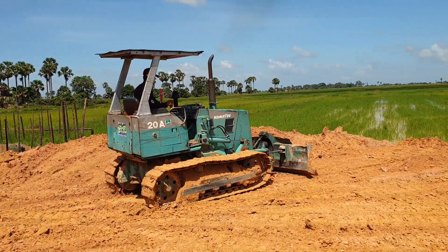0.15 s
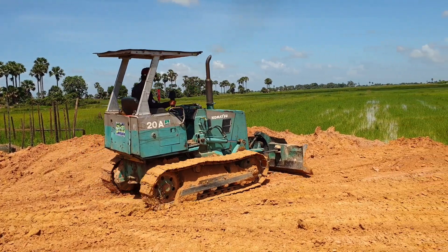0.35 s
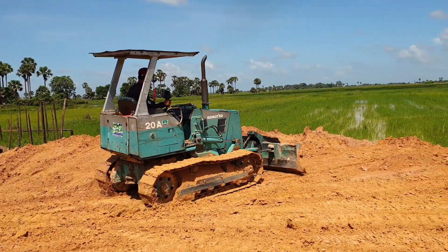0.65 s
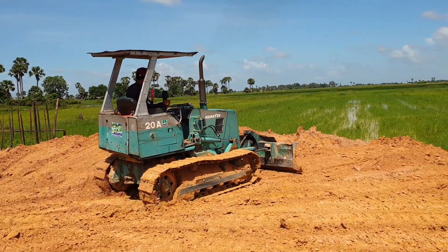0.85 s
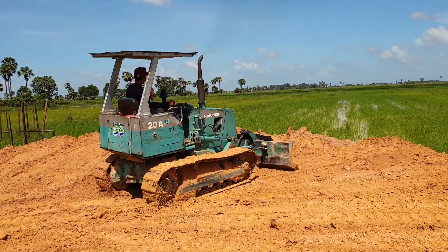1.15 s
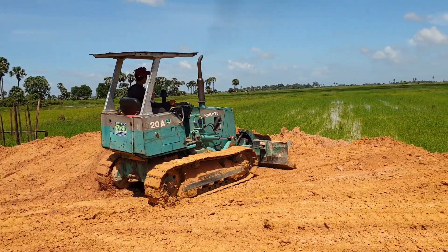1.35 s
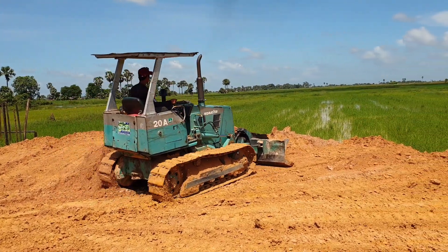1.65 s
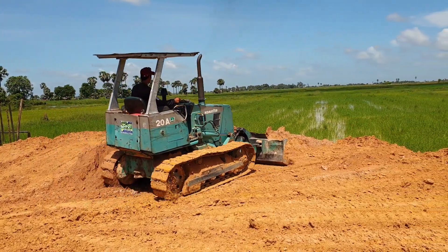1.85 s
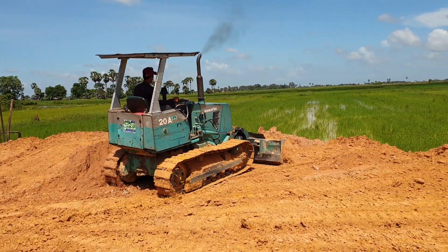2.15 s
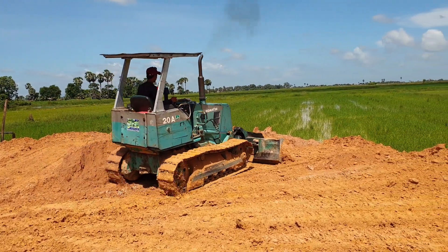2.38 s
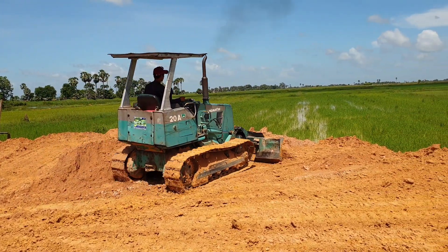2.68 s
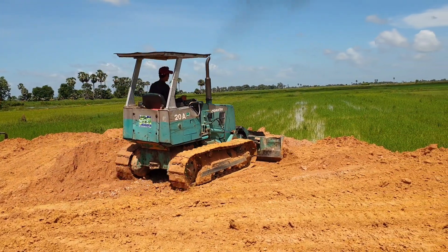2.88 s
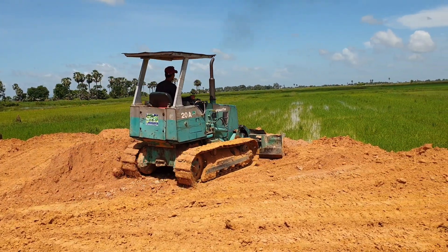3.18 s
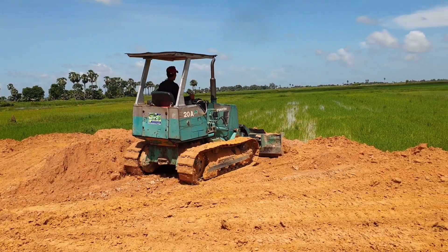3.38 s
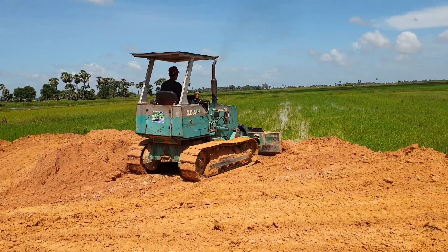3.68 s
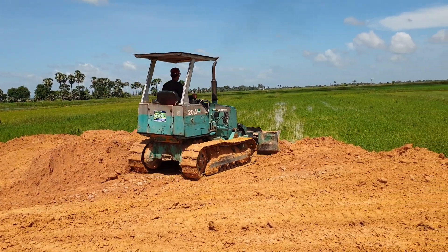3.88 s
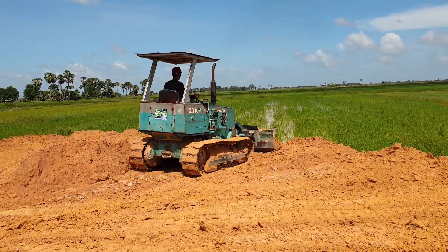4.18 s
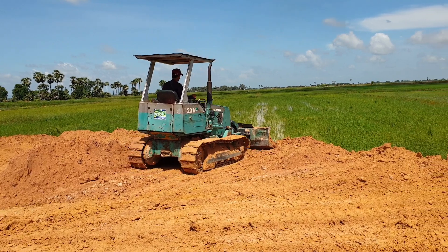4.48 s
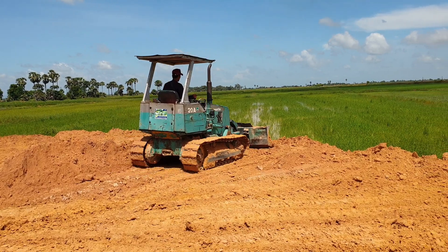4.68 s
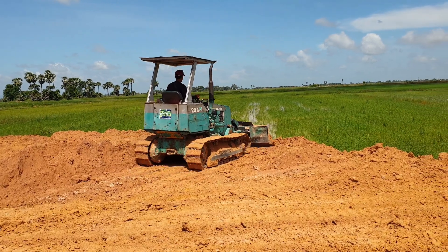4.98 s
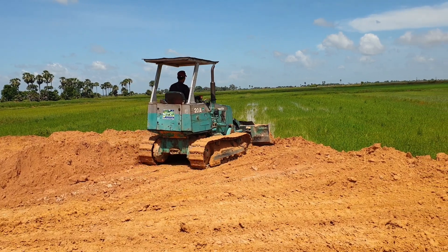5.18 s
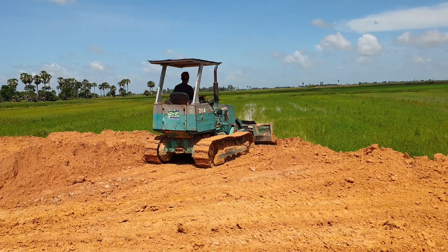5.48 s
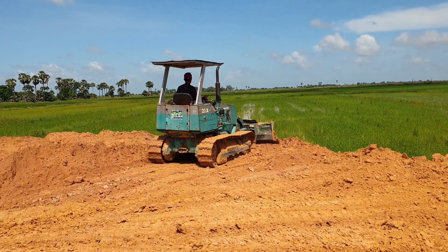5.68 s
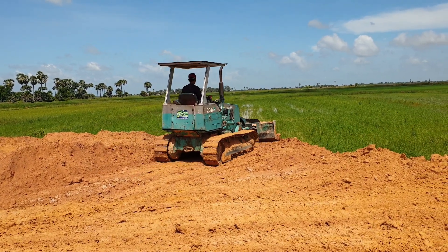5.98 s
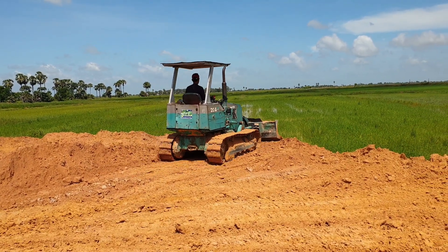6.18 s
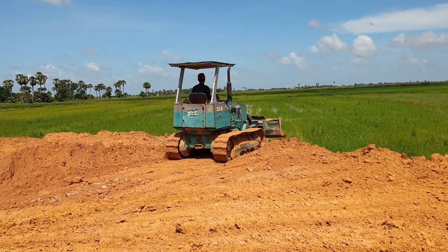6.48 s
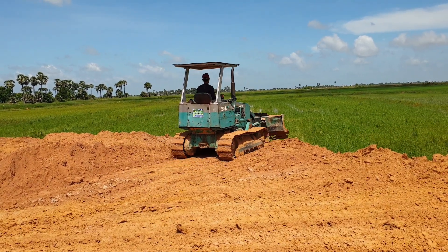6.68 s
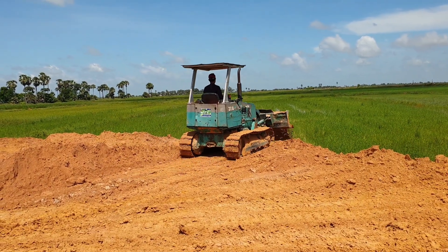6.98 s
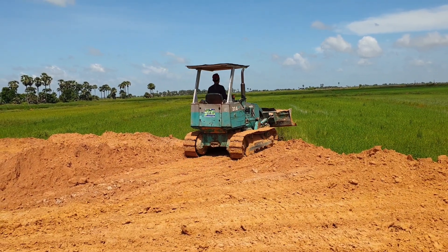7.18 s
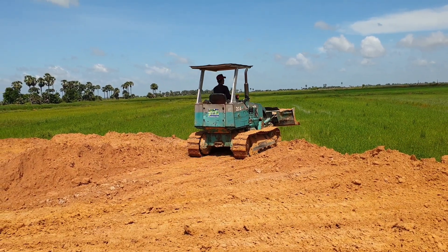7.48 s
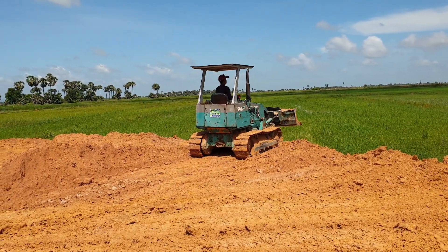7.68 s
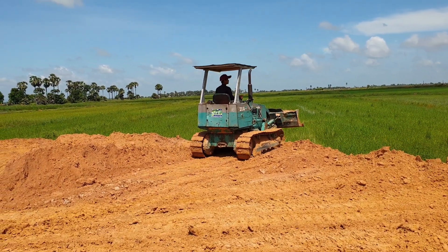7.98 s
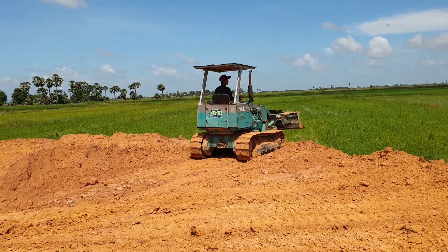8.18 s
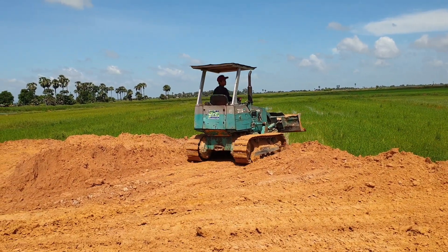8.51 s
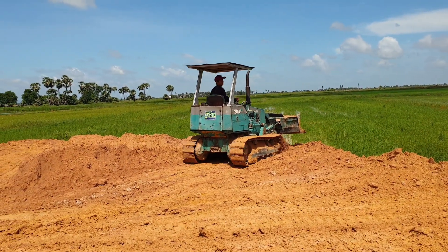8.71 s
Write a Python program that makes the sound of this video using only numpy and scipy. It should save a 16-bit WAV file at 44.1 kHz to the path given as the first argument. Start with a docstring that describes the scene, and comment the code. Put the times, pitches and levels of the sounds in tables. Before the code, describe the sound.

Outdoor stereo pickup of a crawler dozer, fairly close and without reverberation. Its four-cylinder engine holds a deep buzzing hum while metallic exhaust barks flare irregularly as the blade bites. Tracks sing and squeak, dirt tumbles dully. Then the machine runs lighter and softer, with clattering valve gear, whining gears and a dull bump, before a rougher burst of effort closes it, drifting slightly left to right.

```python
"""The four-cylinder diesel of a small crawler bulldozer, a few metres away in an open field, heard by two microphones.
Sines at orders of the firing rate make its drone; cracks and gas noise ring the upright stack into a bark
that rises whenever the blade bites. As the load eases, the clatter of the block and a gear whine come through.
Shaken noise makes wavering bright bands, the tracks sing and squeak, and filtered noise makes soil and rumble.
The machine crosses from left to right as it creeps off."""
import sys
import numpy as np
from scipy import signal
from scipy.fft import rfft, irfft, next_fast_len
from scipy.io import wavfile
from scipy.ndimage import uniform_filter1d, map_coordinates

SR = 44100
rng = np.random.default_rng(int(sys.argv[2]) if len(sys.argv) > 2 else 0)


def int16_out(signal):
    """Quantize to a 16-bit WAV file."""
    q = np.round(np.clip(np.atleast_2d(signal).T, -1, 1) * 32767)
    wavfile.write(sys.argv[1], SR, q.astype(np.int16))


N = 390285
TIME = np.arange(N) / SR

# Speed that the governor holds apart from the bites. Each row: time in seconds, firings per second.
GOVERNED_SPEED = [(0.0, 65.145), (0.64, 65.686), (1.12, 64.8), (1.78, 66.01), (2.06, 63.688),
                  (2.66, 66.386), (3.09, 65.055), (3.52, 67.374), (4.0, 65.872), (4.22, 66.165),
                  (4.3, 67.6), (4.7, 67.2), (6.4, 67.252), (6.88, 66.632), (6.98, 67.906), (7.76, 69.372),
                  (8.04, 65.855), (8.85, 67.662)]
# Bites of the blade, each answered by a surge of fuel.
# Each row: start in seconds, length in seconds, rise of the effort in dB.
FUEL_SURGES = [(0.064, 0.082, 4), (0.255, 0.2, 4), (0.542, 0.043, 4), (0.695, 0.054, 3),
               (0.844, 0.074, 2.5), (1.004, 0.11, 2.5), (1.144, 0.11, 2.5), (1.323, 0.049, 1.58),
               (1.488, 0.013, 3.5), (1.634, 0.048, 2.5), (1.765, 0.05, 4), (1.978, 0.27, 4.5),
               (2.391, 0.076, 2.5), (2.537, 0.11, 6), (2.718, 0.054, 4.5), (2.853, 0.053, 4.5),
               (2.993, 0.11, 4.5), (3.106, 0.12, 2.5), (3.341, 0.057, 2.5), (3.497, 0.046, 6),
               (3.608, 0.1, 9.5), (4.003, 0.21, 4), (6.537, 0.14, 3), (7.986, 0.079, 5), (8.122, 0.17, 2.5),
               (8.416, 0.044, 4), (8.626, 0.054, 3.5), (8.749, 0.052, 4.5)]
SURGE_ATTACK_S, SURGE_RELEASE_S = 0.023, 0.0073
# the engine sags around the start of each bite, the deeper the harder it is
SAG_HZ_PER_DB, SAG_S = .403, .06


def governor():
    """Each bite drags the speed down; the fuel comes up fast, holds and falls back. Gives (firings per s, surge dB)."""
    speed, = in_time(GOVERNED_SPEED)
    surge_db = np.zeros(N)
    for start, length, rise_db in FUEL_SURGES:
        age = TIME - start
        attack = np.clip(age / SURGE_ATTACK_S + .5, 0, 1)
        release = np.exp(-np.clip(age - length, 0, 1) / SURGE_RELEASE_S)
        surge_db += rise_db * attack * release
        speed -= SAG_HZ_PER_DB * rise_db * np.exp(-np.minimum(age ** 2, 1) / SAG_S ** 2)
    return speed, surge_db


# Cylinders in firing order. Each row: relative strength in dB, lateness in firing intervals.
CYLINDER_FIRINGS = [(-1, -.10), (1.7, -.03), (.5, -.10), (-2, .03)]


def puffs(firings, decay, floor):
    """Each exhaust valve opens abruptly and its gas dies away; decay is in firing intervals."""
    gate = floor
    for k, (db, late) in enumerate(CYLINDER_FIRINGS):
        age = (firings - k - late) % len(CYLINDER_FIRINGS)
        gate = gate + from_db(db) * np.exp(-age / decay)
    return rms_one(gate)


# Firing tone as the machine turns and creeps off. Each row: time in seconds, relative level in dB.
FIRING_TONE = [(0.0, -16.7), (1.2, -17), (3.6, -19.8), (5.24, -19.1), (6.18, -17.8), (7.64, -15.2),
               (8.85, -17.7)]
# Lift as the machine turns and creeps off. Each row: time in seconds, lift of the octave in dB, of the growl in dB.
OCTAVE_AND_GROWL_LIFT = [(0, 0, 3), (2.1, -0.5, -2), (3.3, 2, 4.5), (4.1, 3, 7), (4.6, 1, 6), (6.7, 2, 5),
                         (7.3, 1.5, 5), (8.85, 0, 6)]
# Lope of the unequal cylinders. Each row: multiple of the firing rate, relative level in dB.
LOPE_ORDERS = [(.5, -54), (.75, -45), (1.25, -37.5), (1.498, -31.5), (1.749, -37.5)]
# Orders of the growl. Each row: multiple of the firing rate, dB within the growl under load, dB running light.
GROWL_ORDERS = [(2.248, 5, -17.5), (2.501, -17, -6), (2.752, -7, -11), (2.998, 0.5, -12),
                (3.25, 0.5, -19.5), (3.499, -9, -7), (3.752, -18, -14), (4, -7, -5), (4.5, -14.5, -30.5),
                (4.999, -19, -33.5), (5.5, -40, -27), (5.999, -16.5, -26)]
# Low gas noise within the growl. Each row: frequency in Hz, relative dB per Hz.
RUMBLE_SPECTRUM = [(20, -46), (45, -20), (90, -1.5), (180, 13.5), (260, 2), (330, -10), (500, -47.5)]
# How octave, lope and growl follow the engine.
# Each law: relative dB at half load, dB per dB of steady load, dB per dB of surge.
OCTAVE_FOLLOWS = (-19, 0.81, 0.23)
LOPE_FOLLOWS = (-2.9, -0.25, 0.12)
GROWL_FOLLOWS = (-33.5, 1, .75)
WAVER_DB = 1.8  # spread of the wavering of lope and growl orders


def drone(firings, load, load_db, surge_db, strong=1.073, dispersion=3.8):
    """The firing tone and its octave; one strong cylinder adds quarter orders between and above them."""
    tone_db, = in_time(FIRING_TONE)
    octave_db, growl_db = in_time(OCTAVE_AND_GROWL_LIFT)
    turn = 2 * np.pi * firings

    def partial(order, db):
        """One order of the strong cylinder's pulse, which the pipe smears in time."""
        phase = 2 * np.pi * order * (firings - strong) - dispersion * (order - 2) ** 2
        return from_db(db + WAVER_DB * drift(6.9)) * np.sin(phase)

    fundamental = from_db(tone_db - 2.5 + 0.5 * surge_db) * np.sin(turn)
    octave = from_db(octave_db) * follow(OCTAVE_FOLLOWS, load_db, surge_db) * np.sin(2 * turn)
    lope = follow(LOPE_FOLLOWS, load_db, surge_db) * sum(partial(order, db) for order, db in LOPE_ORDERS)
    growl = sum(partial(order, light_db + load * (loaded_db - light_db))
                for order, loaded_db, light_db in GROWL_ORDERS)
    gas = puffs(firings, decay=.2, floor=.4) * rng.standard_normal(N)
    growl += from_db(-9 - 4.5 * load) * colour(gas, RUMBLE_SPECTRUM)
    growl_gain = follow(GROWL_FOLLOWS, load_db, surge_db) * from_db(growl_db)
    # above the first pipe resonance the pressure swings the other way, hence the minus
    return np.sqrt(2) * (fundamental - octave + lope + growl_gain * growl)


# Hotter gas raises all resonances of the stack. Each row: time in seconds, pitch ratio.
GAS_HEAT_PITCH = [(0, 1), (.4, 1.03), (1.2, 1.035), (1.7, 1), (2.2, .99), (3.2, 1.005), (8.85, .99)]


def bark(firings):
    """A crack and a puff of turbulent gas per firing ring the stack, whose pitch rises with the heat of the gas."""
    cracks = np.zeros(N)
    for k, (db, late) in enumerate(CYLINDER_FIRINGS):
        cycles = np.floor((firings - k - late) / len(CYLINDER_FIRINGS))
        at = np.flatnonzero(np.diff(cycles))
        cracks[at] = from_db(db + rng.standard_normal(len(at)))
    gas = puffs(firings, decay=.28, floor=.15) * cycle_noise(firings, repeat=.45)
    # ring a fixed pipe on a warped clock, then unwarp: its pitch follows the heat
    pipe_clock = np.cumsum(in_time(GAS_HEAT_PITCH)[0])
    steps = np.arange(pipe_clock[-1])
    ringing = stack(np.interp(steps, pipe_clock, .55 * rms_one(cracks) + gas))
    # the firings carry similar energy
    ringing /= uniform_filter1d(ringing ** 2 + 1e-9, SR // 30) ** .3
    return rms_one(np.interp(pipe_clock, steps, ringing))


# Resonances of the stack at pitch ratio 1. Each row: frequency in Hz, width in Hz, relative level in dB.
STACK_RESONANCES = [(452, 77, -14), (586, 28, -1.5), (678, 38, -4.5), (813, 63, 3.5), (994, 92, -0.5),
                    (1127, 37, -8), (1184, 17, -15), (1590, 54, -15.5), (1752, 32, -10), (2180, 600, -31)]


def stack(x, muffler_hz=2600, mouth_hz=330):
    """The pipe's resonances side by side; the muffler swallows the treble, the narrow mouth radiates little bass."""
    ringing = sum(from_db(db) * resonate(x, hz, width) for hz, width, db in STACK_RESONANCES)
    band = signal.butter(4, [mouth_hz, muffler_hz], "band", fs=SR, output="sos")
    return signal.sosfilt(band, ringing)


# Single hard firings.
# Each row: time in seconds, relative level in dB of the stack's ring, of the clank, of the bright spit.
HARD_FIRINGS = [(0.083, -29, -31, -42), (0.16, -44, -34, -51), (0.285, -27, -33, -44),
                (0.33, -39, -33, -47), (0.375, -33, -37, -42), (0.392, -45, -40, -43),
                (0.529, -34, -35, -56), (0.593, -30, -41, -44), (0.608, -30, -35, -53),
                (0.701, -50, -35, -37), (0.717, -45, -31, -41), (0.731, -34, -35, -40),
                (0.778, -31, -45, -55), (0.902, -44, -33, -46), (0.948, -31, -44, -51),
                (1.026, -34, -33, -41), (1.072, -31, -46, -43), (1.148, -32, -33, -50),
                (1.198, -32, -40, -39), (1.507, -33, -27, -35), (1.52, -32, -33, -44),
                (1.63, -45, -48, -37), (1.646, -29, -35, -42), (1.768, -31, -34, -56),
                (1.799, -29, -42, -50), (1.816, -31, -30, -40), (1.829, -31, -34, -51),
                (2.001, -37, -32, -32), (2.065, -45, -31, -35), (2.079, -36, -33, -49),
                (2.129, -42, -43, -36), (2.143, -29, -35, -49), (2.192, -36, -30, -29),
                (2.44, -49, -32, -37), (2.564, -46, -26, -30), (2.582, -28, -40, -49),
                (2.609, -29, -38, -48), (2.641, -31, -38, -45), (2.749, -39, -32, -34),
                (2.873, -41, -29, -37), (2.998, -28, -32, -41), (3.013, -28, -43, -39),
                (3.11, -33, -51, -52), (3.508, -28, -58, -55), (3.629, -27, -36, -41),
                (3.677, -32, -37, -34), (7.988, -43, -34, -56), (8.02, -33, -42, -32),
                (8.034, -36, -31, -42), (8.141, -34, -31, -42), (8.187, -50, -34, -40),
                (8.446, -53, -31, -40)]
# Resonances for ring, clank and spit, in that order. Each row: frequency in Hz, width in Hz, gain in dB.
HARD_FIRING_MODES = [(825, 140, -.3), (1100, 240, 2), (1620, 340, 2.5)]


def knocks(thump_db=-12, thump_hz=195, thump_s=.006):
    """Now and then a cylinder fires hard: a burst rings the stack and the steel around it, over a low thump."""
    out, age = np.zeros(N), TIME[:SR // 10]
    thump = -np.sin(2 * np.pi * thump_hz * age) * np.exp(-age / thump_s)
    for s, *levels in HARD_FIRINGS:
        gas = rng.standard_normal(len(age)) * age * np.exp(-age / .0011)
        burst = from_db(thump_db) * from_db(levels).sum() * thump
        for db, (hz, width, gain_db) in zip(levels, HARD_FIRING_MODES):
            ring = resonate(resonate(gas, hz, width), hz, width)
            # level the ring by its first 12 ms
            burst += from_db(db + gain_db) * ring / ring[age < .012].std()
        at = round(s * SR)
        out[at:at + len(age)] += burst
    return out


# Sound of the block. Each row: frequency in Hz, relative dB per Hz.
BLOCK_SPECTRUM = [(150, -9), (280, 2), (340, -3.5), (480, -5), (620, 3), (800, 1), (950, -3), (1180, -6),
                  (1380, -15.5), (1850, -7), (2120, -17), (2500, -19.5), (3000, -24), (6000, -54)]


def clatter(firings):
    """Injectors and valve gear knock on the block, partly alike in every cycle."""
    taps = puffs(firings, decay=.15, floor=.7) * from_db(1.2 * drift(30))
    return colour(taps * cycle_noise(firings, repeat=0.23), BLOCK_SPECTRUM)


# Rasp and hiss of the engine. Each row: frequency in Hz, relative dB per Hz.
RASP_SPECTRUM = [(900, -8), (1750, 5), (2100, -3), (2500, 0), (2850, 2), (3150, 3.5), (3450, 0), (3680, 5),
                 (4050, -1), (4450, -6.5), (5300, -14), (6300, -13), (12000, -35)]
HISS_SPECTRUM = [(3000, -12.5), (5000, 7), (6000, 0), (7400, 4), (8900, -4), (10500, 2), (12200, 4.5),
                 (13800, 4), (15500, 0.5)]
# Hiss apart from the surges. Each row: time in seconds, relative level in dB.
HISS_CURVE = [(0.0, -48), (1.22, -44.5), (1.68, -48), (2.21, -45), (2.32, -48), (3.18, -48), (3.28, -51.5),
              (4.8, -52.5), (8.85, -53)]
# How the rasp follows the engine: relative dB at half load, dB per dB of steady load, dB per dB of surge.
RASP_FOLLOWS = (-43.5, 0.51, 0.46)


def rush(firings, load_db, surge_db, rasp_flutter_db=1.5, hiss_flutter_db=1.5):
    """An even rasp, and a hiss that swells with each firing; both flutter on their own."""
    hiss_db, = in_time(HISS_CURVE)
    swell = puffs(firings, decay=.36, floor=.85)
    rasp = colour(cycle_noise(firings, repeat=0.43), RASP_SPECTRUM) * from_db(rasp_flutter_db * drift(12))
    hiss = colour(swell * rng.standard_normal(N), HISS_SPECTRUM) * from_db(hiss_flutter_db * drift(17))
    return follow(RASP_FOLLOWS, load_db, surge_db) * rasp + from_db(hiss_db + 0.62 * surge_db) * hiss


# Bright band near 2.3 kHz, strongest under load, with a faint higher one running light.
# Each row: time in seconds, mean pitch in Hz, relative level in dB.
MID_BRIGHT_BAND = [(0, 2350, -52), (.4, 2380, -48), (.75, 2330, -47.5), (1.2, 2150, -44.5),
                   (1.45, 2300, -54), (1.95, 2300, -56), (2.15, 2260, -41.5), (2.35, 2300, -54),
                   (2.6, 2260, -49), (2.8, 2260, -53), (3.65, 2258, -57), (4, 2380, -63), (6, 2630, -62),
                   (6.5, 2664, -59), (7.2, 2550, -58), (7.9, 2555, -60), (8.05, 2350, -51),
                   (8.85, 2400, -67)]
# Lower and upper bright band that waver. Each row: time in seconds, mean pitch in Hz, relative level in dB.
LOW_BRIGHT_BAND = [(0, 3080, -51), (.9, 3140, -46.5), (1.6, 3030, -49.5), (1.85, 3160, -45.5),
                   (2.7, 3210, -50), (3.2, 3120, -48), (3.7, 3100, -56), (4.3, 2920, -58.5),
                   (6.8, 2960, -63), (7.9, 3000, -70), (8.03, 3100, -57), (8.3, 3090, -47),
                   (8.85, 3056, -59)]
HIGH_BRIGHT_BAND = [(0, 3880, -49), (.75, 4020, -46), (1.7, 3940, -46.5), (2.2, 4017, -47),
                    (2.7, 3940, -48), (3.1, 4120, -48.5), (3.35, 4000, -54.5), (4.2, 4010, -61),
                    (5.2, 3747, -76), (5.6, 3747, -56), (6.1, 3710, -58), (6.6, 3740, -55.5),
                    (7.2, 3650, -60), (7.9, 3764, -68), (8.03, 3820, -54), (8.3, 3820, -51),
                    (8.85, 3807, -57)]


def bright_bands(firings, surge_db, mid_width_hz=320, low_width_hz=170, high_width_hz=240, per_surge=.55, jitter_hz=55):
    """Each firing sets off three bright bands of noise, whose pitch and strength waver."""
    pulses = puffs(firings - .03, decay=.2, floor=.12) * from_db(1.8 * drift(25))
    pulses = pulses * cycle_noise(firings, repeat=.45)
    bands = (MID_BRIGHT_BAND, mid_width_hz), (LOW_BRIGHT_BAND, low_width_hz), (HIGH_BRIGHT_BAND, high_width_hz)
    out = 0
    for curve, width_hz in bands:
        hz, db = in_time(curve)
        band = moving_band(pulses, hz + jitter_hz * drift(9), width_hz)
        out = out + from_db(db + per_surge * surge_db) * band
    return out


# Whines of the drive train.
# Each row: start in seconds, end in seconds, multiple of the firing rate, relative level in dB.
GEAR_WHINES = [(0, 1.8, 6, -48), (0, 3.2, 13.1, -43), (1.3, 4.4, 12.4, -41), (1.4, 4.4, 9, -46.5),
               (4.4, 6.6, 9, -50), (0, 1.9, 5.5, -47), (4.7, 6.3, 5.5, -52), (5.1, 6.3, 22, -56),
               (6.3, 7, 63.2, -62), (4.3, 7.3, 18, -52), (4.2, 5.3, 36.3, -60), (4.1, 6.9, 45, -61),
               (4.85, 6.05, 45, -55), (4.2, 5.5, 63.2, -63.5), (6.4, 7.55, 6, -45.5),
               (6.9, 7.55, 10.5, -44), (6.8, 7.3, 11.5, -49), (7.95, 8.9, 15.6, -45), (7.9, 8.5, 4.5, -42)]


def gears(firings, waver_db=3.8, wobble=.8, fade_s=.12):
    """Whines follow the engine speed, and come and go as the drive takes up or sheds load; wobble in radians."""
    out = np.zeros(N)
    for start, end, order, db in GEAR_WHINES:
        engaged = np.clip(np.minimum(TIME - start, end - TIME) / fade_s, 0, 1)
        level = from_db(db + waver_db * drift(7.7))
        out += engaged * level * np.sin(2 * np.pi * order * firings + wobble * drift(6.8))
    return out


# Singing of the track steel. Each row: time in seconds, pitch in Hz, relative level in dB.
STEEL_SONG = [(0, 3110, -68), (1.7, 3200, -52), (2.0, 3250, -48), (2.2, 3250, -37), (2.4, 3220, -46),
              (2.62, 3220, -42), (2.85, 3170, -52), (3.3, 3115, -42.5), (3.7, 3090, -40.5),
              (3.85, 3030, -58), (6.0, 3030, -58), (7.2, 3040, -75), (8.85, 3040, -58)]
# Squeaks of the track pins, their pitch wavering around the line from start to end.
# Each row: middle in seconds, length in seconds, start pitch in Hz, end pitch in Hz, relative level in dB.
PIN_SQUEAKS = [(0.73, 0.05, 3950, 3790, -41), (2.231, 0.052, 3420, 3140, -40),
               (2.963, 0.082, 3630, 4120, -42), (6.278, 0.05, 5210, 4790, -47),
               (6.48, .12, 2730, 2690, -51), (6.58, 0.066, 4200, 4170, -49), (6.76, .18, 3560, 3640, -51),
               (6.85, .14, 4220, 4190, -56), (7.13, .2, 2420, 2610, -50), (2.395, .04, 14200, 13800, -49),
               (6.82, .03, 11050, 10850, -54)]


def tracks(firings):
    """Dry steel rubs on steel: a rough ringing note that the engine's shaking breaks up, and a few squeaks."""
    hz, db = in_time(STEEL_SONG)
    turn = 2 * np.pi * np.cumsum(hz) / SR
    shaken = puffs(firings - .15, decay=.45, floor=.25)
    rough_note = drift(70) * np.sin(turn) + drift(70) * np.cos(turn)
    out = from_db(db) * resonate(shaken * rough_note, 3150, 600) * .8
    waver_hz = 30 * drift(60)
    for s, length, start_hz, end_hz, level_db in PIN_SQUEAKS:
        along = np.clip((TIME - s) / length + .5, 0, 1)
        pitch = start_hz + (end_hz - start_hz) * along + waver_hz
        out += from_db(level_db) * np.sin(np.pi * along) * np.sin(2 * np.pi * np.cumsum(pitch) / SR)
    return out


# Soil crumbling over the blade. Each row: time in seconds, relative level in dB.
SOIL_LEVEL = [(0, -56), (1.7, -53), (2.1, -42), (3.1, -45.5), (4.2, -49), (4.7, -64), (8.85, -61)]


def soil(hz=440, width_hz=260, lumpy_db=3):
    """Clods break and tumble in front of the blade: a dull, lumpy crumbling."""
    db, = in_time(SOIL_LEVEL)
    clods = rng.standard_normal(N) * from_db(lumpy_db * drift(30))
    return from_db(db) * rms_one(resonate(resonate(clods, hz, width_hz), hz, width_hz))


def bump(db=-33):
    """One dull, low bump of noise."""
    swell = np.exp(-((TIME - 6.66) / .05) ** 2)
    spectrum = [(20, -9), (45, -9), (170, 0), (400, -16), (1500, -64)]  # Hz, relative dB
    return from_db(db) * swell * colour(rng.standard_normal(N), spectrum)


def ground(db=-44):
    """A faint, even rumble under the drone."""
    spectrum = [(20, -12), (45, -17), (70, -4), (120, 2), (200, -11), (500, -51)]  # Hz, relative dB
    return from_db(db) * colour(rng.standard_normal(N), spectrum)


# Bands cancelled by echoes off hood and ground. Each row: frequency in Hz, width in Hz, depth from 0 to 1.
ECHO_NOTCHES = [(930, 45, .5), (1345, 150, .52), (2130, 150, .5), (2780, 170, .55)]


def hollowed(x):
    """Short echoes cancel a few narrow bands and leave a hollow, metallic colour."""
    for hz, width, depth in ECHO_NOTCHES:
        x = x - np.clip(depth, 0, 1) * resonate(x, hz, width)
    return x


# Likeness of the two microphones. Each row: frequency in Hz, left-right likeness from -1 to 1.
MIC_LIKENESS = [(60, 1), (300, 0.67), (700, 1), (1400, 0.7), (2500, .85), (3500, 0.38), (4800, -0.24),
                (7000, -0.2), (15000, 0)]
# Balance of the two microphones. Each row: frequency in Hz, left minus right in dB.
MIC_BALANCE = [(60, -3), (210, -2.5), (500, -1), (1170, -0.5), (1800, -3), (2700, -4.5), (4100, -7),
               (6400, 2.5), (10000, -1.5), (15000, -2.5)]
# Phase lead of the left microphone, on top of its head start. Each row: frequency in Hz, lead in radians.
MIC_LEAD = [(60, .41), (130, .27), (250, .17), (800, .14), (2000, .1), (3100, .35), (4000, 1.0), (7000, 0)]


def microphones(direct, scattered):
    """The bass reaches both microphones alike; the treble arrives scattered by machine and ground."""
    size = next_fast_len(N)
    hz = np.fft.rfftfreq(size, 1 / SR)
    alike = np.clip(at_hz(MIC_LIKENESS, hz), -1, 1)
    sides = np.array([[1], [-1]])  # left, right
    common = np.sqrt((1 + alike) / 2) * rfft(direct, size)
    opposed = sides * np.sqrt((1 - alike) / 2) * rfft(scattered, size)
    ports = from_db(sides * at_hz(MIC_BALANCE, hz) / 2) * np.exp(.5j * sides * at_hz(MIC_LEAD, hz))
    return irfft((common + opposed) * ports, size)[:, :N]


# How much earlier the sound reaches the left microphone. Each row: time in seconds, head start in microseconds.
LEFT_HEAD_START = [(0, 35), (2.5, 35), (5, 20), (6.5, -5), (8.85, -35)]


def bearing(pair):
    """As the machine crosses from left to right, the left microphone loses its head start."""
    lead = in_time(LEFT_HEAD_START)[0] * SR / 1e6  # in samples
    moved = [map_coordinates(x, [np.arange(N) + side * lead / 2], order=3, mode="nearest")
             for x, side in zip(pair, (1, -1))]
    return np.array(moved)


HALF_LOAD_DB = -32  # effort at which the engine is half loaded


def follow(law, load_db, surge_db):
    """Gain of a layer that follows the steady load and each surge."""
    level_db, per_load, per_surge = law
    return from_db(level_db + per_load * (load_db - HALF_LOAD_DB) + per_surge * surge_db)


def cycle_noise(firings, repeat, size=2600):
    """Noise of which a share of the power comes back alike in every engine cycle."""
    share = np.clip(repeat, 0, 1)
    place = firings / len(CYLINDER_FIRINGS) % 1 * size
    pattern = np.interp(place, np.arange(size), rng.standard_normal(size))
    return np.sqrt(share) * rms_one(pattern) + np.sqrt(1 - share) * rng.standard_normal(N)


def resonate(x, hz, width_hz):
    """One resonance with gain 1 on top."""
    r = np.exp(-np.pi * width_hz / SR)
    feedback = [1, -2 * r * np.cos(2 * np.pi * hz / SR), r * r]
    return signal.lfilter(np.array([1, 0, -1]) * (1 - r * r) / 2, feedback, x)


def moving_band(x, hz, width_hz):
    """A resonance whose centre follows a curve; rms 1."""
    turn = np.exp(2j * np.pi * np.cumsum(hz) / SR)
    slow = signal.sosfilt(signal.butter(2, width_hz / 2, fs=SR, output="sos"), x / turn)
    return rms_one((slow * turn).real)


def colour(x, spectrum, size=4096):
    """Causal (minimum-phase) filter with the given spectrum; rms 1."""
    cepstrum = irfft(np.log(from_db(at_hz(spectrum, np.fft.rfftfreq(size, 1 / SR)))))
    cepstrum[1:size // 2] *= 2
    response = irfft(np.exp(rfft(cepstrum[:size // 2], size)))
    return rms_one(signal.fftconvolve(x, response)[:N])


def drift(rate):
    """Smooth chance with spread 1, wandering faster at a higher rate."""
    r = np.exp(-80 * np.pi * rate / SR)  # one step per 40 samples
    slow = signal.lfilter([1], [1, -2 * r, r * r], rng.standard_normal(N // 40 + 2002))[2000:]
    return np.interp(np.arange(N) / 40, np.arange(len(slow)), rms_one(slow))


def from_db(db):
    """Decibels to gain."""
    return 10 ** (np.asarray(db) / 20)


def rms_one(x):
    """Scale to unit power."""
    return x / np.sqrt(np.mean(x ** 2) + 1e-20)


def in_time(rows):
    """Each column of a curve at every sample."""
    s, *columns = np.transpose(rows)
    return [np.interp(TIME, s, c) for c in columns]


def at_hz(points, hz):
    """Read a spectrum on a log-frequency axis."""
    f, value = np.transpose(points)
    return np.interp(np.log(hz + 1), np.log(f), value)


# Steady load of the soil on the blade. Each row: time in seconds, load in dB.
SOIL_LOAD = [(0.0, -32.5), (0.98, -30), (1.54, -30.5), (3.19, -33.5), (3.42, -37.5), (4.02, -37.5),
             (4.5, -40), (5.78, -39), (6.94, -36.5), (7.32, -41.5), (7.88, -42.5), (8.02, -33.5),
             (8.4, -33.5), (8.85, -37)]
# How the clatter follows the engine: relative dB at half load, dB per dB of steady load, dB per dB of surge.
CLATTER_FOLLOWS = (-38.3, .25, .2)
START = -.329  # where in its cycle the engine starts, in firing intervals


def scene():
    """The soil sets the load: the bark rises over the clatter as the blade bites."""
    speed, surge_db = governor()
    firings = START + np.cumsum(speed) / SR
    load_db, = in_time(SOIL_LOAD)
    effort_db = load_db + surge_db
    load = 1 / (1 + from_db(2 * (HALF_LOAD_DB - effort_db)))  # 0 running light, 1 fully loaded
    bark_gain = from_db(effort_db - 2.0) * load ** 0.25
    clatter_gain = follow(CLATTER_FOLLOWS, load_db, surge_db)

    def machine():
        """The noisy part of the sound, different along each path."""
        engine = bark_gain * bark(firings) + knocks() + clatter_gain * clatter(firings)
        engine = hollowed(engine + rush(firings, load_db, surge_db))
        return engine + bright_bands(firings, surge_db) + tracks(firings) + soil()

    whine = from_db(0.54 * surge_db + 0.5) * gears(firings)
    tones = drone(firings, load, load_db, surge_db) + whine
    direct = machine() + tones + bump() + ground()
    return bearing(microphones(direct, machine()))


CUTOFF_HZ = 15450


def record(dry):
    """The top is cut steeply; both ends fade over a few milliseconds."""
    to_edge = np.minimum(TIME, TIME[-1] - TIME)
    fade = np.sin(np.pi / 2 * np.clip(to_edge / .004, 0, 1)) ** 2
    return signal.sosfilt(signal.ellip(12, .1, 90, CUTOFF_HZ, fs=SR, output="sos"), dry * fade)


dry = scene()
out = record(dry)
int16_out(out)
```